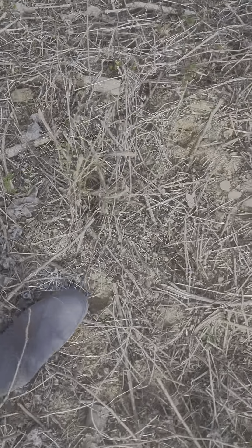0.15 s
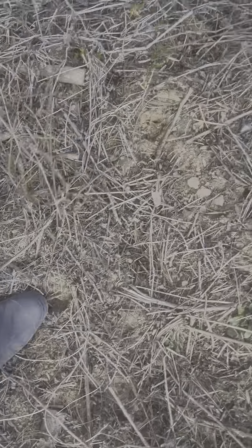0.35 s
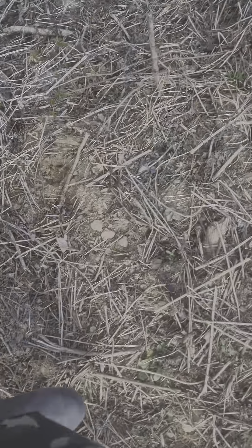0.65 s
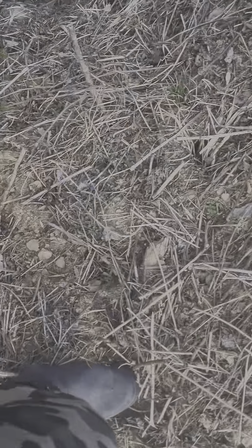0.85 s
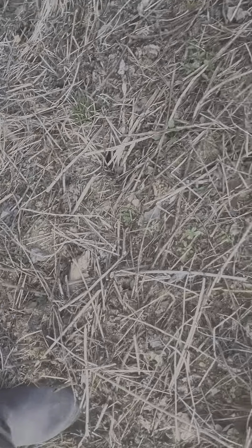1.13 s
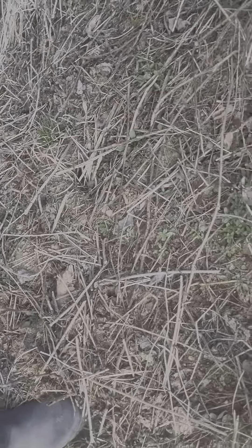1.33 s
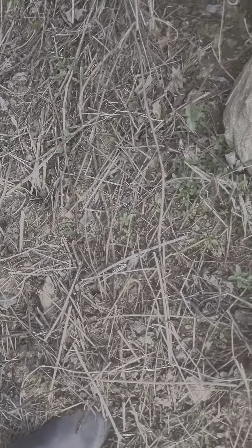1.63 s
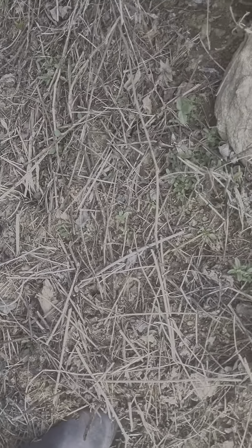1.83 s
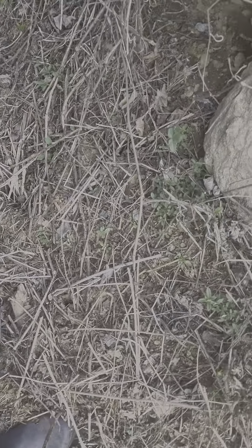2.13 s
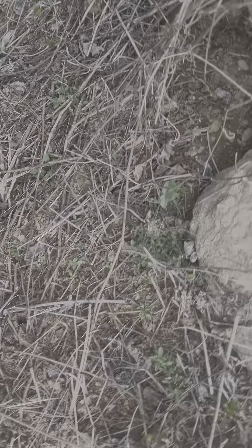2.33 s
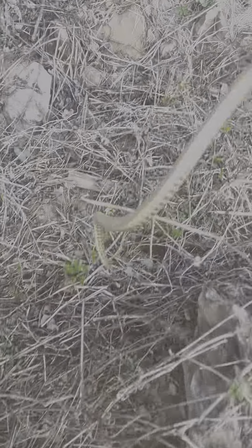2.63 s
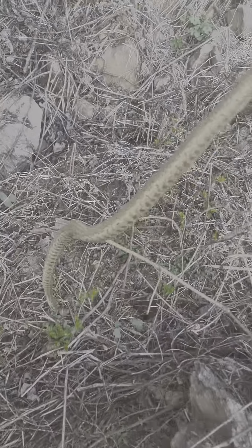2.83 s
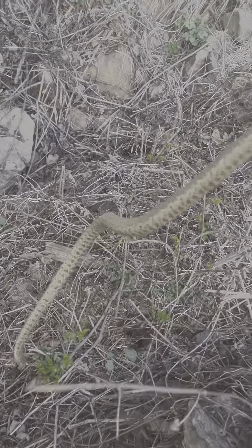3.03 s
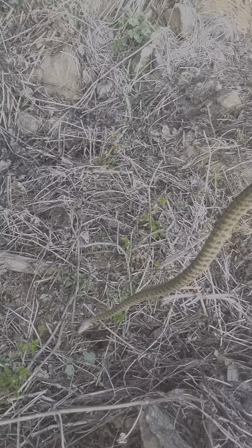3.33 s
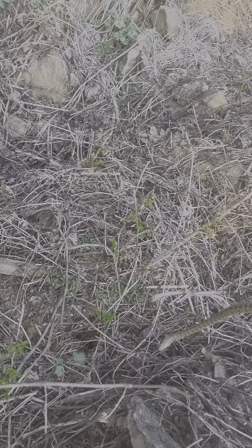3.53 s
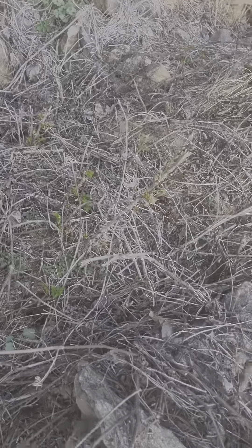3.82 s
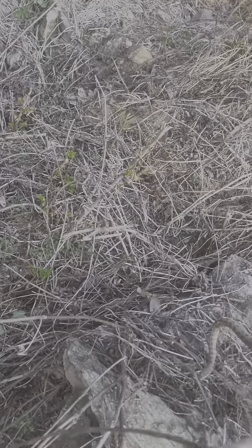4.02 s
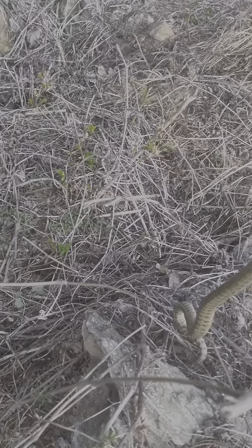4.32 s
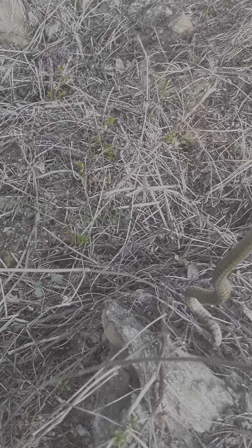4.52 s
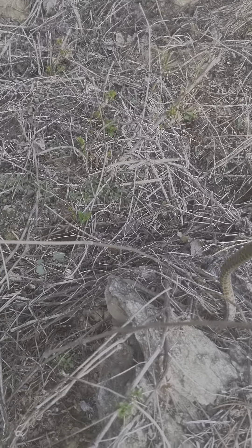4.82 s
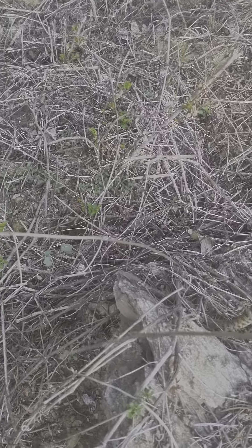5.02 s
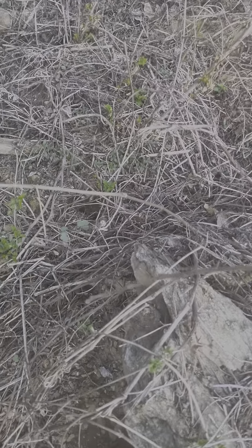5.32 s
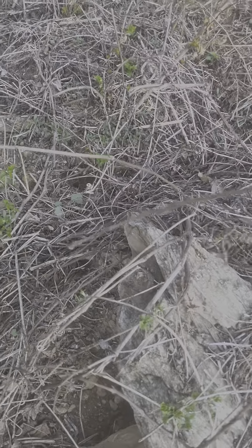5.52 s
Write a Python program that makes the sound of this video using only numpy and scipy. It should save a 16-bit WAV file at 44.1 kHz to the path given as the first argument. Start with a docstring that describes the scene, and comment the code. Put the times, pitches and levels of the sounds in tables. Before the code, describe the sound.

Crisp footsteps crackle over brittle stalks on an open slope, strong at first, then sparser, ending on a sharp fresh crunch.

```python
"""Dry stalks and dead leaves rustle, crunch and snap under boots and a stick on an open hillside,
with dull stem knocks, below a hand-held phone; light wind rumbles on its two microphone ports.
Rustle: noise shaped by dense random cracks. Snaps: short decaying noise bursts in five ranges.
Knocks: damped, ragged low sines. Wind: low coloured noise, with puffs. Low hum: coloured noise,
swelling as the stick drags. A steady faint hush lies below."""
import sys
import numpy as np
from scipy import signal
from scipy.fft import rfft, irfft, next_fast_len
from scipy.io import wavfile
from scipy.ndimage import uniform_filter1d, map_coordinates

SR = 44100
rng = np.random.default_rng(int(sys.argv[2]) if len(sys.argv) > 2 else 0)


def to_wav(sig):
    """Store sig (one row per channel, or 1-D mono) as 16-bit WAV at the path in sys.argv[1].

    Samples outside -1..1 are clipped; the rate is SR.
    """
    pcm = np.clip(np.atleast_2d(sig), -1, 1) * 32767
    pcm = np.round(pcm).astype(np.int16)
    wavfile.write(sys.argv[1], SR, pcm.T)  # frames by channels


N = 249606

# Turning of the phone. Each row: time in seconds, left-right difference in dB.
PHONE_AIM = [(0.0, -6.0), (0.82, -2.5), (1.69, -4.5), (2.08, -1.5), (2.66, -4), (3.94, -6), (5.66, -1.5)]


def rustle():
    """Superposed friction cracks: a hiss of countless fibres; harder pressure packs the cracks closer."""
    gains = pressure()
    per_s = 400 * (gains[-1] / amp(-50.5)) ** .45
    broad = cracks(per_s, spread_db=2.2, t60=0.0085)
    # each range also has cracks of its own, which die faster the higher it lies
    own_t60s = (0.041, 0.015, 0.0064, 0.0063, 0.0017)
    own = np.array([cracks(.5 * per_s, spread_db=2.5, t60=t60) for t60 in own_t60s])
    broad_share = np.array([[.07], [.14], [.21], [.25], [.25]])
    grain = np.sqrt(0.56 + broad_share * broad ** 2 + 0.27 * own ** 2)
    noise = patchy(ports(), depth_db=1.4)
    flicker = amp([depth_db * wobble(40) for depth_db in (1.3, 1.37, 1.4, 1.2, 1.2)])
    common_flicker = amp(1.28 * wobble(70))
    aim = panned(curves(PHONE_AIM)[0])
    return (gains * flicker * grain)[:, None] * noise * aim * common_flicker


# Slow pressure on the litter. Each row: time in seconds, level in dB before grain and flicker,
# weight in dB (about the low range over that level).
SLOW_PRESSURE = [(0.0, -53, -12), (0.07, -46.5, -20), (0.44, -47.5, -16), (0.7, -48.5, -17),
                 (0.87, -57.5, -12.5), (1.19, -49.5, -11.5), (1.41, -61.5, -4), (1.73, -55.0, -15.5),
                 (2.11, -57, -17), (2.65, -54.5, -8.5), (2.95, -52, -19), (3.19, -59.5, -10.5),
                 (3.45, -55, -1), (3.8, -67.5, -1.5), (4.03, -46.0, -29), (4.4, -50, -17), (4.58, -57, -20),
                 (4.96, -58, -22), (5.19, -66, -17), (5.5, -52, -18.5), (5.66, -40, -25.5)]
# Heaps of leaves crushed at once. Each row: start of the hold in seconds, level in dB before grain
# and flicker, weight in dB, rise by 20 dB in ms, hold in ms, fall by 20 dB in ms.
CRUNCHES = [(0.15, -35, -22, 43, 61.0, 19.0), (0.237, -30.0, -18.5, 116, 14, 124.0),
            (0.289, -37.0, -18.5, 44, 40, 6), (0.368, -44, -20.5, 51.0, 58.0, 64.0),
            (0.652, -51, -8.5, 27.0, 11.0, 71.0), (0.735, -42, -17, 8.0, 8.0, 36.0),
            (0.891, -26.5, -18.5, 37, 11.6, 76), (0.952, -42.0, -21.5, 22.0, 77, 104.0),
            (1.077, -42.5, -22, 87.0, 25, 24.0), (1.121, -53, -9, 51, 23.0, 8.0),
            (1.305, -48.5, -16, 88, 60, 118), (1.451, -43.5, -25.5, 25.0, 40.0, 96),
            (1.556, -32, -18, 24.5, 23.4, 52), (1.63, -50, -20.5, 22.0, 60, 151),
            (1.808, -47.5, -26, 7.0, 50, 36.0), (1.894, -49.0, -28, 24.0, 22, 23.0),
            (2.039, -49, -35, 11.0, 24, 51.0), (2.202, -54, -13, 102.0, 8.0, 30.0),
            (2.446, -49, -19.5, 92.0, 103, 26), (2.759, -29.5, -19.0, 33.0, 34.6, 14),
            (2.827, -40.5, -21.5, 149.0, 20, 46), (2.992, -45.5, -22.5, 41.0, 7.0, 159.0),
            (3.091, -48.5, -26.0, 20.0, 70, 95.0), (3.304, -40, -34, 44, 59.0, 75.0),
            (3.454, -30.0, -25.5, 58.5, 32, 56), (3.525, -39, -25.5, 42.0, 73, 155),
            (3.813, -51, -26, 66, 5.0, 45), (3.909, -47.5, -32, 149.0, 57.0, 61),
            (4.257, -62.0, -7.0, 83.0, 38, 45.0), (4.42, -50, -25.5, 152, 86, 95.0),
            (4.68, -50.5, -27, 52.0, 28, 92.0), (4.79, -57.0, -27, 95.0, 81.0, 27.0),
            (5.071, -54.5, -18, 33.0, 8.7, 45), (5.277, -41, -26.5, 143.0, 31, 112.0),
            (5.394, -43.5, -21, 54, 25, 35.0), (5.51, -44.5, -28.0, 35, 29, 14),
            (5.619, -32.5, -28, 5, 13, 45)]


def pressure():
    """Addition of powers: the slow pressure and every crunch give the gain of each range over time."""
    power = amp(2 * ranges_db(*curves(SLOW_PRESSURE)))
    ms = np.arange(N) * 1000 / SR
    for s, level_db, weight_db, rise, hold, fall in CRUNCHES:
        near = slice(max(round((s - .15) * SR), 0), round((s + .4) * SR))
        since = ms[near] - 1000 * s
        outside_hold = np.maximum(0, np.maximum(-since / rise, (since - hold) / fall))
        levels_db = ranges_db(level_db, weight_db)[:, None] - 20 * outside_hold
        power[:, near] += amp(2 * levels_db)
    return np.sqrt(power)


# Rustle colour, one row for each of the low, body, middle, high and top range.
# Each row: dB over the level, dB gained per dB of weight.
RUSTLE_COLOUR = [(-0.04, 1), (1.34, 0.75), (-7.0, 0.17), (-8, 0.42), (-1.7, 0)]


def ranges_db(level_db, weight_db):
    """Spectral tilt: weight on the litter lifts the low ranges most and the top range not at all."""
    return np.array([level_db + db + share * weight_db for db, share in RUSTLE_COLOUR])


def cracks(per_s, spread_db, t60):
    """Shot noise: random tiny cracks at a changing rate, many weak, few strong, each dying at once."""
    happens = rng.random(N) < per_s / SR
    size_db = spread_db * np.minimum(rng.exponential(size=N), 4)
    sizes = happens * amp(size_db) / np.sqrt(per_s)
    onset = uniform_filter1d(sizes ** 2, size=24)
    energy = signal.lfilter([1], [1, -amp(-120 / (t60 * SR))], onset)
    return unit(np.sqrt(np.abs(energy)))


def patchy(x, depth_db):
    """Time-frequency modulation: leaves of different size sound in different patches of pitch and time."""
    z = signal.stft(x, nperseg=256)[2]
    field = rng.standard_normal(z.shape[1:])
    field = uniform_filter1d(field, size=9, axis=0)
    field = uniform_filter1d(field, size=12, axis=1)
    return unit(signal.istft(z * amp(depth_db * unit(field)), nperseg=256)[1][:, :N])


# Snapping stalks. Each row: start in seconds, top-range energy in dB over 1 ms before the snap colour,
# dullness in dB (high over top), thickness in dB (body over top), left-right difference in dB,
# decay by 60 dB in seconds.
SNAPS = [(0.1498, -9, -7, -19, -3, 0.0092), (0.2347, -13.5, -6, -14.5, -5, 0.0063),
         (0.33, -9.5, -12, -23, -2, 0.0017), (0.3701, -36, 1, -18, 6, 0.0036),
         (0.385, -33, 3.5, -5.5, -3, 0.0061), (0.419, -22.5, 0, -12.5, -5.5, 0.0076),
         (0.444, -39, 0, -2, -1, 0.0076), (0.4939, -34, -8, -22, -4, 0.007),
         (0.5308, -25, -6, -17.5, -4, 0.0078), (0.5746, -37, -12, -18, -7, 0.007),
         (0.6469, -40, -1, -11, -4, 0.0049), (0.7373, -23, 2.5, -7, -3, 0.0024),
         (0.8451, -39, -6, -17, 0, 0.0052), (0.9724, -44, 7, -4, 5, 0.0016),
         (1.0144, -31, -6, -8, -4, 0.007), (1.0834, -28, -4, -18, -7, 0.006),
         (1.1846, -37.5, 2, -16, -3, 0.0047), (1.328, -36, -2, -21, 5, 0.007),
         (1.4894, -18.5, -0.5, -23, -6.5, 0.0036), (1.5234, -36, -5, -26, -11, 0.007),
         (1.5502, -28, 1, -14, -4, 0.007), (1.6516, -33, -7, -20, -9, 0.0029),
         (1.808, -42, -1, -10, 6, 0.007), (1.8318, -32, -6, -30, 0, 0.007),
         (1.855, -30, -4.5, -32, -6, 0.0067), (1.901, -38, 0, -17, -2, 0.007),
         (1.9109, -39, 1, -18, -6, 0.0029), (1.9302, -37, -10, -26, -2, 0.0022),
         (1.9657, -44, -14, -21, -4.5, 0.0069), (2.1083, -46, -9, -19, -7, 0.0037),
         (2.1446, -41, 0, -13, -2, 0.007), (2.1608, -41, 1, -22, -6, 0.0016),
         (2.2017, -39.5, -5, -18, 2, 0.007), (2.7005, -37.5, -5, -17, -11, 0.0055),
         (2.7715, -20, -5, -20, -5, 0.0045), (2.7914, -13, -4, -20, -4.5, 0.003),
         (2.8232, -31, -1, -20, -4, 0.0069), (2.8549, -33, -3, -20, -5, 0.0032),
         (2.8865, -35, -5, -27, -6, 0.007), (2.9263, -40, -3, -17, -3, 0.007),
         (2.9877, -30, -15, -28, -7, 0.0036), (3.0034, -34.5, 5.5, -8, -3, 0.0032),
         (3.0404, -38, -15, -24, -7, 0.0024), (3.0487, -44, 3, -4, -2, 0.0021),
         (3.0901, -18.5, -8, -14, -7.5, 0.0025), (3.11, -30, -9, -30, -5, 0.005),
         (3.1424, -28.5, -7, -25, -5, 0.0017), (3.1596, -31, -6, -33, -5, 0.006),
         (3.2884, -37, 2, -7.5, -6, 0.0049), (3.307, -28.5, -10, -18, -7, 0.0044),
         (3.437, -33, -3.5, -13, -2, 0.007), (3.4541, -35, 2, -8, -6, 0.0037),
         (3.4841, -24, -1, -9.5, -5, 0.0069), (3.523, -33, 3, -16, -8, 0.0024),
         (3.5917, -30, -1, -9, -1, 0.0053), (3.6124, -28, -7, -25, -9, 0.0042),
         (3.6983, -39, -12, -13, -10, 0.0039), (3.7823, -50.5, -6, 2.5, -5, 0.004),
         (3.802, -44, -1, -22, -14, 0.0029), (3.926, -37, 2, -22, -6, 0.0052),
         (3.965, -37.5, 6, -27, -7, 0.0035), (4.0173, -34.5, 2, -23, -11, 0.0049),
         (4.1254, -33, -0.5, -23, -8, 0.0036), (4.1973, -31.5, -9, -22, -9, 0.0062),
         (4.2804, -40, -2, -14, -5, 0.007), (4.47, -36, -8, -25, -2, 0.0051),
         (4.4787, -40, 3, -14, -6, 0.0037), (4.5527, -41, -5, -23, -12, 0.0065),
         (4.6771, -43, 6.5, -18, -6, 0.0042), (4.6915, -42, 3, -17, -5, 0.0035),
         (4.784, -51, -3, 1, -4, 0.004), (4.8123, -51, 8.5, -13, -4, 0.0027),
         (4.8267, -37, -14, -33, -9, 0.0014), (4.8692, -48, -4, -24, -10, 0.0022),
         (5.0377, -58, 4, 6, -3, 0.004), (5.2615, -35, -13, -21, -5, 0.007),
         (5.3463, -47.5, 8, -2.5, -8, 0.0027), (5.5317, -33, -1, -19, 5, 0.007),
         (5.5384, -25, -5, -34, 1, 0.0034), (5.5616, -41, 1, -19, -10, 0.0061),
         (5.6201, -13.5, -8.5, -12.5, -0.5, 0.011), (5.63, -19.5, -5, -17.5, -5, 0.0063)]
# Snap colour, one row for each of the five ranges, low to top.
# Each row: dB over the top-range energy, dB gained per dB of dullness, dB gained per dB of thickness.
SNAP_COLOUR = [(-15.5, 0.4, 1.03), (0.5, 0, 1), (-4, 0.44, 0.47), (-0.3, 1, 0), (0.5, 0, 0)]
SHIVER_DB = -26  # a broken stalk's trembling under its crack, before its onset
SNAP_ALIKE = 0.7  # a single break reaches both ports much alike: least likeness


def snaps(pulses):
    """Brittle fracture: a stalk breaks in one short burst and shivers on; thick ones have more body."""
    out = np.zeros((2, N + SR))
    t = np.arange(SR // 20) / SR
    noise = np.pad(ports(SNAP_ALIKE), ((0, 0), (0, SR)), "wrap")
    shiver = amp(SHIVER_DB - 60 * t / 0.059) * (1 - np.exp(-t / 0.00036))
    for s, top_db, dull_db, thick_db, pan_db, t60 in SNAPS:
        i = round(s * SR)
        crack = amp(-60 * t / t60) * (1 - np.exp(-t / 0.00031)) ** 2
        shape = crack / crack.max() + shiver
        burst = signal.fftconvolve((shape * noise[:, i:i + len(t)])[None], pulses, axes=2)
        # 0 dB is the energy of 1 ms at full level, in each range and port
        burst *= np.sqrt(SR / 1000) / np.linalg.norm(burst, axis=2, keepdims=True)
        levels_db = top_db + np.dot(SNAP_COLOUR, [1, dull_db, thick_db])
        mixed = np.tensordot(amp(levels_db), burst, 1)
        out[:, i:i + burst.shape[2]] += panned(pan_db)[:, None] * mixed
    return out[:, :N]


def litter():
    """Source and filter: rustle and hush excite the five range pulses, and the snaps join them."""
    pulses = colours()
    steady = signal.fftconvolve(rustle() + hush(), pulses, axes=2).sum(axis=0)[:, :N]
    return steady + snaps(pulses)


# Colour of litter and microphone. Each row: frequency in Hz, relative power density in dB per Hz.
LITTER_COLOUR = [(150, -31.5), (250, -11.5), (347, -11.5), (555, -10.5), (841, -14.5), (1800, -12),
                 (2340, -13.5), (3080, -12.5), (4280, -8.5), (5180, -5.5), (8270, -1.5), (9020, 0.5),
                 (11100, -9.5), (12500, -6.5), (15700, -8)]
# Edges between the five ranges. Each entry: frequency in Hz.
EDGES_HZ = [900, 3000, 6500, 10500]


def colours():
    """Band splitting: all crackle shares the colour of litter and microphone, one pulse a range."""
    def below(hz, edge):
        return 1 / (1 + (hz / edge) ** 10)

    def part(lo, hi):
        def gain(hz):
            band = np.sqrt(below(hz, hi) * (1 - below(hz, lo)))
            return band * amp(along(LITTER_COLOUR, np.clip(hz, 0, 15700)) - 90 * (hz > 16200))
        return gain

    edges = [1e-3, *EDGES_HZ, SR]
    return np.array([causal(part(lo, hi)) for lo, hi in zip(edges, edges[1:])])[:, None]


# Likeness of the ports apart from the lead. Each row: frequency in Hz, coherence from 0 to 1.
PORT_ALIKE = [(100, 0.92), (500, 0.7), (2000, 0.43), (8000, 0.081), (16000, 0.15)]
# Phase between the ports. Each row: frequency in Hz, lead of the left port in radians.
PORT_LEAD = [(0, -2), (340, -1.1), (860, -2.5), (1810, -3.5), (3270, -2), (3790, -3.0), (6030, -7),
             (8530, -13.5), (11800, -18), (13400, -16), (15000, -31), (15900, -19), (16300, -70),
             (16500, -27)]
# Balance of the ports. Each row: frequency in Hz, left-right difference in dB.
PORT_BALANCE = [(100, 2.5), (500, 1), (1000, 1), (2000, -0.5), (6000, 3.5), (13000, -2)]


def ports(at_least=0):
    """Partial coherence: white noise reaches the two ports partly alike, the left one a little later."""
    def share(hz):
        turn = np.arccos(np.clip(along(PORT_ALIKE, hz), np.clip(at_least, 0, 1), 1)) / 2
        return np.array([np.cos(turn), np.sin(turn)])

    def shift(hz):
        lead = np.interp(hz, *np.transpose(PORT_LEAD))
        return panned(along(PORT_BALANCE, hz)) * np.exp(.5j * np.outer([1, -1], lead))

    same, other = filtered(rng.standard_normal((2, N)), share)
    return filtered(np.array([same + other, same - other]), shift)


# Dull knocks of thick stems. Each row: start in seconds, level in dB before a common lift and the onset,
# mean pitch in Hz, decay by 60 dB in seconds.
KNOCKS = [(0.079, -42.5, 240, 0.04), (0.114, -36.5, 278, 0.046), (0.182, -38.5, 320, 0.039),
          (0.232, -26, 600, 0.026), (0.661, -42, 753, 0.057), (1.123, -36.5, 412, 0.025),
          (1.195, -49, 450, 0.09), (1.324, -52, 445, 0.046), (1.431, -47, 566, 0.043),
          (1.489, -39, 750, 0.029), (1.564, -28, 582, 0.033), (1.688, -54, 250, 0.028),
          (2.216, -46, 312, 0.035), (3.047, -51, 262, 0.058), (3.277, -49, 253, 0.023),
          (4.12, -51, 236, 0.035)]


def knocks():
    """Damped vibration: a thick stem gives a ragged low swing, which reaches the right port first."""
    out = np.zeros(N + SR)
    t = np.arange(SR // 10) / SR
    onset = 1 - np.exp(-t / 0.0025)
    for s, db, hz, t60 in KNOCKS:
        phase = 2 * np.pi * hz * t + 0.07 * np.cumsum(rng.standard_normal(len(t)))
        swing = amp(db + 2.0 - 60 * t / t60) * np.sin(phase) * onset
        out[round(s * SR):][:len(t)] += swing
    return np.array([np.roll(out, 12), out])[:, :N] * panned(-2.7)[:, None]  # left 12 samples late


# Course of the low sounds. Each row: time in seconds, mean buffet level in dB, mean low hum level in dB.
LOW_COURSE = [(0, -62.5, -62.5), (.3, -64.5, -64), (.85, -65, -66), (1.4, -64, -70), (2.0, -67, -72.5),
              (2.7, -63.5, -69), (3.15, -65, -62.5), (3.48, -69, -55), (3.7, -68.5, -60), (4.2, -66, -63.5),
              (4.6, -68, -66.5), (5.1, -69, -74.5), (5.45, -67, -71), (5.66, -68, -62.5)]
# Spectrum of the low hum. Each row: frequency in Hz, relative power density in dB per Hz.
HUM_COLOUR = [(65, -30), (110, 4), (145, -7), (167, -4.5), (247, 5), (328, -10), (439, -7.5), (600, -24),
              (780, -78.5), (1320, -120)]


def low_hum():
    """Coherent low noise: a low hum, swelling as the stick drags, reaches both ports alike."""
    hum_db = curves(LOW_COURSE)[1] + 1.4 * wobble(8.9)
    return amp(hum_db) * low_noise(HUM_COLOUR, alike=2.8) * panned(-0.35)[:, None]


# Puffs on the ports. Each row: peak time in seconds, peak level in dB, rise or fall by 9 dB in seconds.
PUFFS = [(.26, -60, 0.1), (.92, -58, 0.09), (1.6, -60.5, 0.2), (2.21, -59, 0.1), (2.6, -56, 0.03),
         (2.69, -43.5, 0.07), (3.04, -50.5, 0.02), (3.51, -54, 0.02), (3.89, -65, .04), (4.79, -62, 0.12)]
# Spectra of buffet and puff. Each row: frequency in Hz, relative power density in dB per Hz.
BUFFET_COLOUR = [(12, -58), (20, -4), (43, -6.5), (59, 8.5), (79, 8.5), (140, -16.5), (160, -3.5),
                 (210, -38), (350, -120)]
PUFF_COLOUR = [(12, -47), (28, -12), (52, 2), (75, 0), (115, -15), (200, -57), (350, -120)]


def wind():
    """Turbulent pressure: air buffets each port partly in its own way, deeper in a puff."""
    buffet_db = curves(LOW_COURSE)[0] + 1.9 * wobble(7)
    t = np.arange(N) / SR
    puff_gain = sum(amp(db - 9 * np.abs(t - s) / width) for s, db, width in PUFFS)
    buffet = amp(buffet_db) * low_noise(BUFFET_COLOUR, alike=.6)
    puffs = puff_gain * low_noise(PUFF_COLOUR, alike=.9)
    return (buffet + puffs) * panned(-1.5)[:, None]


def low_noise(spectrum, alike):
    """Partial coherence: coloured noise, a shared part and one of each port's own."""
    noise = rng.standard_normal((3, N))
    shared, left, right = filtered(noise, lambda hz: amp(along(spectrum, hz)))
    return unit(alike * shared + np.array([left, right]))


# Hush of the open slope. Each entry: level in dB of one range, low to top, before the range pulse.
HUSH_DB = [-80, -74, -71, -69.5, -74]


def hush():
    """Stationary noise: the open slope keeps a steady level in each range."""
    return amp(HUSH_DB)[:, None, None] * unit(ports())


def amp(db):
    """Logarithmic level: decibels to amplitude."""
    return 10 ** (np.asarray(db) / 20)


def unit(x):
    """Normalisation to a root mean square of 1."""
    return x / np.sqrt(np.mean(x ** 2) + 1e-20)


def panned(db):
    """Level difference: left and right gains for a left-right difference in dB."""
    return amp(np.array([db / 2, -db / 2]))


def along(points, hz):
    """Interpolation of (Hz, value) points on a logarithmic axis."""
    f, v = np.transpose(points)
    return np.interp(np.log(hz + 1), np.log(f + 1), v)


def curves(rows):
    """Linear interpolation: one value per sample for each column after the time."""
    s, *cols = np.transpose(rows)
    return [np.interp(np.arange(N) / SR, s, c) for c in cols]


def wobble(rate):
    """Spline interpolation: a smooth random curve with rate knots a second."""
    knots = rng.standard_normal(int(N * rate / SR) + 4)
    return map_coordinates(knots, [np.arange(N) * rate / SR])


def filtered(x, response):
    """Linear filtering: the spectrum of x times a complex response of frequency."""
    m = next_fast_len(N + SR // 2)
    return irfft(rfft(x, m) * response(np.fft.rfftfreq(m, 1 / SR)), m)[..., :N]


def causal(gain):
    """Minimum phase by folding the cepstrum: the earliest pulse of this gain, with energy 1."""
    cep = irfft(np.log(gain(np.fft.rfftfreq(4096, 1 / SR)) + 1e-6))
    cep[1:2048] *= 2
    cep[2049:] = 0
    pulse = irfft(np.exp(rfft(cep)))[:1024]
    return pulse / np.linalg.norm(pulse)


def scene():
    """Superposition: litter, stem knocks, low hum and wind add at the two ports."""
    return litter() + knocks() + low_hum() + wind()


# Steep upper edge of the sound. Each row: frequency in Hz, gain in dB.
UPPER_EDGE = [(15800, 0), (15950, -22), (16900, -55)]
CUT_HZ = 16974  # band limit


def record(dry):
    """Band limiting: the treble drops steeply near the top and nothing remains above the limit."""
    return filtered(dry, lambda hz: amp(along(UPPER_EDGE, hz)) * (hz < CUT_HZ))


dry = scene()
out = record(dry)
to_wav(out)
```